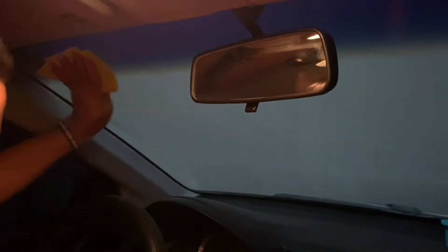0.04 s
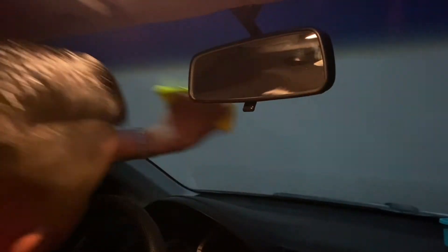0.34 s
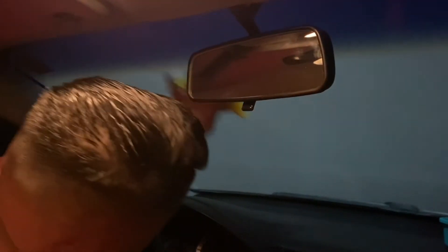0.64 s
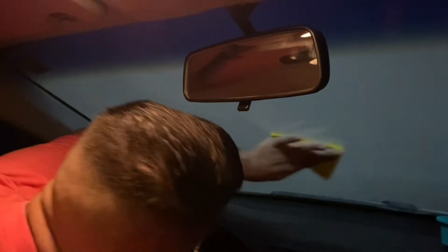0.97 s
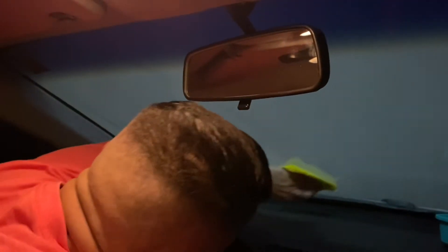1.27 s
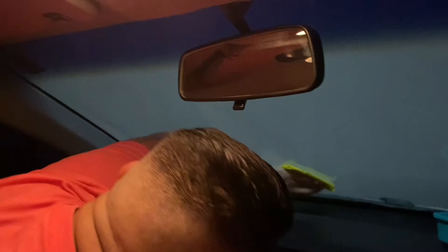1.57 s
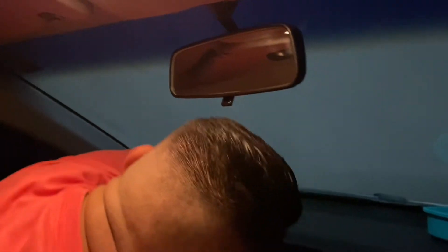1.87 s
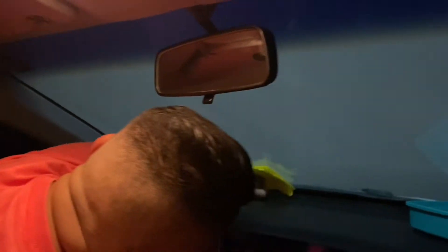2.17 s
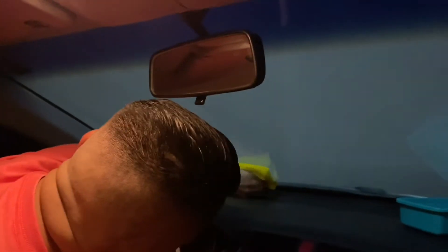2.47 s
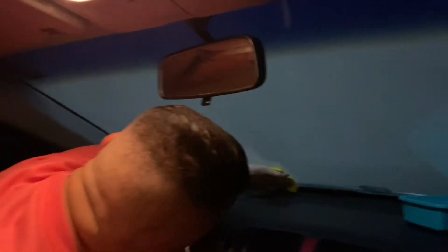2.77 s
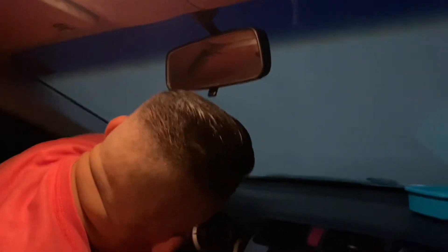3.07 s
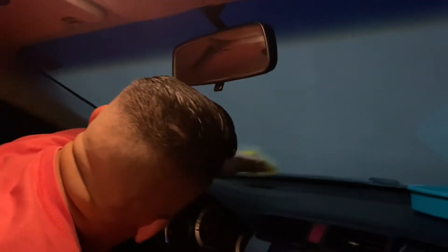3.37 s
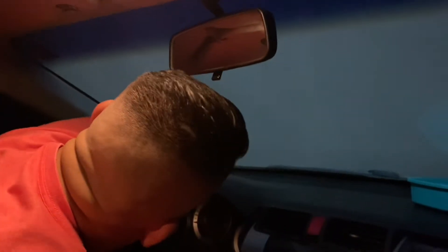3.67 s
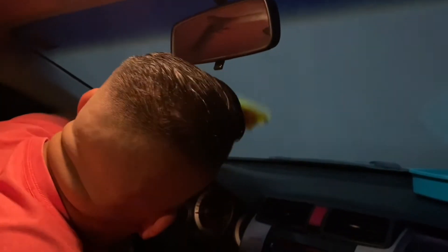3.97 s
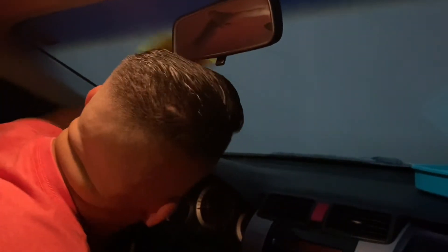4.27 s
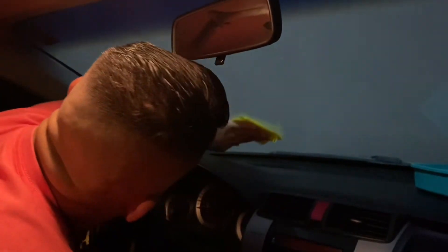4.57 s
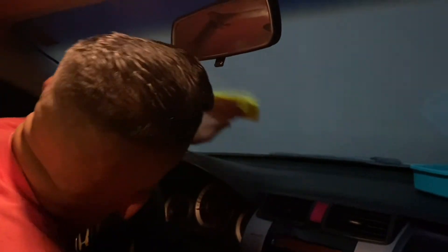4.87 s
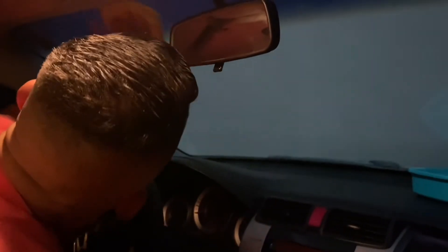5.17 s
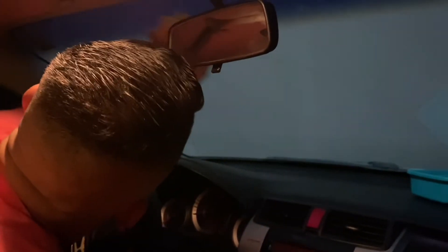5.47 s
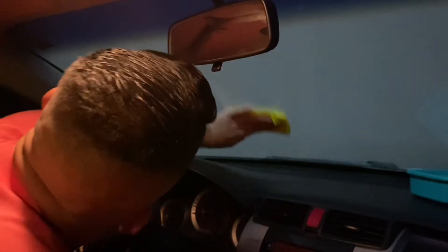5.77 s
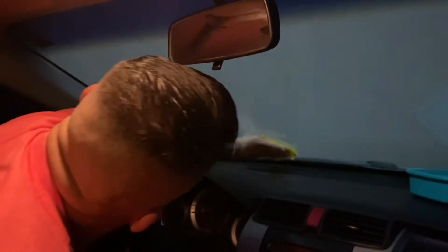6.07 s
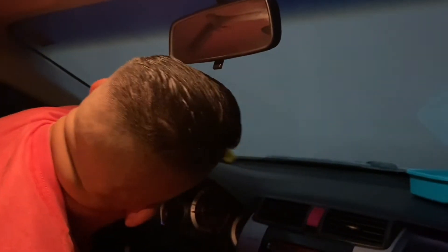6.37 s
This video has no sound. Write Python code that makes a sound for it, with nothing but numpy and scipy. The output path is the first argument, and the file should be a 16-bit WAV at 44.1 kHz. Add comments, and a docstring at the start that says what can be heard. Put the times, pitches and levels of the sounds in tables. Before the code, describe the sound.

Quiet, papery strokes of a cloth rub the inside of a car windshield, heard close up in the muffled cabin. The wiping soon turns into a deeper drag with finger skids, sharp knocks and dull dashboard bumps over a low seat rumble. A second group of knocks follows and plastic trim snaps once. Gentler wiping carries on with brief scuffs, ending in a few crisper swishes.

```python
"""A cloth wipes to and fro inside the windshield of a closed, parked car, its fibres hissing stroke by
stroke while the seat rumbles under the leaning person. From 1 s it is pressed to the foot of the glass:
it judders, fingers skid, and the hand knocks and bumps the dashboard. More knocks come just after 3 s,
then a snap of plastic trim. Lighter strokes lead to scuffs near 5.2 s and a few last, brighter wipes.
The small padded cabin answers briefly throughout."""
import sys
import numpy as np
from scipy import signal
from scipy.fft import rfft, irfft, next_fast_len
from scipy.io import wavfile

SR = 44100
rng = np.random.default_rng(int(sys.argv[2]) if len(sys.argv) > 2 else 0)


def wav_out(sig):
    """Save sig, one row per channel (or a flat mono array), as 16-bit PCM at SR to the path in sys.argv[1]."""
    wavfile.write(sys.argv[1], SR, np.round(np.clip(np.atleast_2d(sig).T, -1, 1) * 32767).astype(np.int16))


N = 287973
T = np.arange(N) / SR


def amp(db):
    """Decibels to gain."""
    return 10 ** (np.asarray(db) / 20)


def unit(x):
    """Scales each channel to an rms of one."""
    return x / np.sqrt(np.mean(x ** 2, axis=-1, keepdims=True) + 1e-20)


def unit_hit(x):
    """Scales a hit to the energy of 15 ms at unit level."""
    return unit(x) * np.sqrt(.015 * SR / x.shape[1])


def read(points, hz):
    """Reads a table on a log-frequency axis."""
    f, value = np.transpose(points)
    return np.interp(np.log(hz + 1), np.log(f + 1), value)


def follow(curve):
    """A level curve as a gain per sample, fading out over 50 ms beyond either end."""
    s, db = np.transpose(curve)
    gate = np.interp(T, [s[0] - .05, s[0], s[-1], s[-1] + .05], [0, 1, 1, 0])
    return amp(np.interp(T, s, db)) * gate


def add(mix, s, sound):
    """Mixes a sound in at s seconds."""
    part = mix[:, max(round(s * SR), 0):][:, :sound.shape[1]]
    part += sound[:, :part.shape[1]]


def colour(x, points, tilt_db=0, size=8192):
    """Minimum-phase EQ, tilted by tilt_db per octave about 1 kHz; the tilt levels off below 400 Hz."""
    hz = abs(np.fft.fftfreq(size, 1 / SR))
    octaves = np.log2(np.maximum(hz, 400) / 1000)
    log_gain = np.log(amp(read(points, hz) + tilt_db * octaves))
    taps = np.fft.ifft(np.exp(np.conj(signal.hilbert(log_gain)))).real[:size // 2]
    return signal.fftconvolve(x, taps[None], axes=1)[:, :x.shape[1]]


def wander(count, per_s):
    """Random modulation of unit rms, gliding to a new value per_s times a second."""
    steps = np.arange(count) * per_s / SR
    return unit(np.interp(steps, np.arange(4096), rng.standard_normal(4096)))


def slips(count, spread_db):
    """Countless fibres catching and letting go, a few much harder than the rest."""
    noise, catch = rng.standard_normal(count), rng.exponential(1, count)
    return unit(noise * amp(spread_db * np.minimum(catch, 6)))


def wiping(speed_power=0.86, flutter_db=1.76):
    """The hand speeds up and slows in one arch per stroke; fibres hiss and the glass adds a papery rub."""
    # strokes, turn to turn (mid-stroke time [s], length [s], hiss [dB], hiss tilt [dB/octave], rub [dB])
    strokes = [(0.141, 0.19, -70.5, 2, -75), (0.35, 0.21, -72.5, 1.5, -79), (0.509, 0.23, -62.5, 1, -68.5),
               (0.698, 0.26, -64, -0.5, -68), (0.887, 0.21, -70, 0.5, -69.5),
               (1.231, 0.66, -62.5, 1.5, -65), (1.681, 0.52, -63.5, 2, -71.5), (1.939, 0.21, -60, 0.5, -71),
               (2.193, 0.37, -62, 2, -74), (2.439, .12, -64.5, 0.5, -77), (2.573, 0.076, -69, 0, -76),
               (2.723, 0.34, -75.5, 0.5, -95), (2.983, 0.42, -67, 0.5, -71.5), (3.181, 0.22, -67, 1.5, -73),
               (3.517, 0.22, -69.5, -0.5, -80), (3.677, 0.26, -65, 6, -86), (3.873, 0.14, -71, 5, -86),
               (4.021, 0.15, -72, 1.5, -70.5), (4.112, .12, -67.5, 1, -74), (4.228, .12, -72, 0, -79),
               (4.45, 0.24, -74, 2.5, -85), (4.661, 0.061, -67.5, 0.5, -90), (4.782, 0.3, -70.5, 7.5, -91),
               (4.976, 0.25, -72.5, -0.5, -78), (5.533, 0.25, -103, 4, -74.5), (5.781, 0.33, -86, 3, -77.5),
               (5.953, .33, -62.5, 8, -74.5), (6.114, 0.21, -70, 0.5, -75.5), (6.311, .14, -73, 1, -69.5),
               (6.462, 0.28, -62, 5, -76.5)]
    # tone of the hissing fibres (frequency [Hz], level [dB])
    fibre_eq = [(60, -21), (250, 7), (700, 3), (1300, 3), (2000, 5), (3200, 5.5), (5000, 0), (7200, 0),
                (11000, -1), (16000, -4.5)]
    # tone of the rubbed glass (frequency [Hz], level [dB])
    glass_eq = [(60, -20), (300, 3.5), (700, -5), (950, -2), (1130, -4.5), (1340, 1.5), (1550, -10),
                (1800, -3.5), (2200, -3.5), (2550, -3), (2950, -8), (6000, -27.5), (16000, -40.5)]
    out = np.zeros((2, N))
    for s, length, hiss_db, tilt_db, rub_db in strokes:
        t = np.arange(max(s - length / 2, 0), s + length / 2, 1 / SR)
        speed = abs(np.cos(np.pi * (t - s) / length))
        # the reflections shift as the hand travels: crossfade between two spots
        travel = np.pi / 2 * ((t - s) / length + .5)
        start, end = (cabin(slips(len(t), spread_db=4), wet_db=-2, size=4096) for _ in range(2))
        friction = np.cos(travel) * start + np.sin(travel) * end
        friction *= amp(flutter_db * wander(len(t), per_s=35.4))
        hiss = amp(hiss_db) * speed ** speed_power * unit(colour(friction, fibre_eq, tilt_db, size=2048))
        rub = amp(rub_db) * speed * unit(colour(friction, glass_eq, size=2048))
        add(out, t[0], hiss + rub)
    return out


def dragging(judder_db=3):
    """Pressed hard into the gap between glass and dashboard, the cloth judders and sounds deeper."""
    # how hard the cloth drags (time [s], level [dB])
    pressure = [(1.05, -67), (1.14, -53.5), (1.266, -55), (1.374, -55), (1.556, -60.5), (1.816, -57),
                (2.142, -55), (2.35, -73)]
    # tone of the pressed cloth (frequency [Hz], level [dB])
    pressed_eq = [(40, -8.5), (150, 15), (300, -11), (600, -5.5), (900, -7.5), (1500, -17), (3000, -34),
                  (8000, -26.5)]
    drag = slips(N, spread_db=6.5) * amp(judder_db * wander(N, per_s=70))
    return follow(pressure) * unit(colour(cabin(drag, wet_db=6), pressed_eq))


def contact(t, noise_db, decay_s):
    """Hard surfaces meet: an impulse with a tiny burst of noise."""
    return (t == 0) + amp(noise_db) * rng.standard_normal(len(t)) * np.exp(-t / decay_s)


def knocks(off_pitch_db=9, nail_tilt=0.089):
    """Knuckles and nails ring the modes of glass and dashboard, with a tick from the hard contact."""
    # knocks (time [s], ring [dB], centre of the strike [Hz], tick [dB])
    hits = [(1.092, -42.5, 1100, -52.5), (1.108, -44, 910, -53.5), (1.187, -48, 1890, -74),
            (1.258, -48, 900, -66), (1.363, -48, 1220, -57.5), (1.503, -39, 830, -54),
            (1.5074, -26.5, 720, -43.5), (1.64, -58.5, 1200, -64.5), (1.714, -50, 955, -59.5),
            (1.829, -52, 710, -63.5), (1.978, -48.5, 370, -69), (2.065, -57, 1000, -59),
            (2.09, -48, 596, -67), (2.56, -67, 900, -62), (3.0662, -50, 1040, -79),
            (3.0901, -33.5, 1040, -50), (3.131, -46, 530, -80), (3.192, -35.5, 1200, -60.5),
            (3.4051, -57, 1134, -55), (3.545, -59, 1000, -68.5), (3.965, -68, 1000, -92)]
    # modes of glass and dashboard (frequency [Hz], level [dB], t60 [s])
    modes = [(295, 6, 0.055), (438, 2.5, 0.022), (530, -4.5, 0.04), (787, -3, 0.025), (873, 0.5, 0.029),
             (1000, -5, 0.021), (1179, -4, 0.023), (1507, -10.5, 0.027), (1800, -11, 0.0267),
             (2160, -13.5, 0.0284), (2760, -14, 0.03)]
    # tone of the tick (frequency [Hz], level [dB])
    tick_eq = [(100, -9), (700, -5.5), (1400, 1.5), (2500, 5), (4500, 1.5), (5800, -6.5), (7500, -3),
               (10500, -5), (12500, -10), (16000, -13)]
    out, t = np.zeros((2, N)), np.arange(SR // 4) / SR
    hz, mode_db, t60 = np.transpose(modes)[:, :, None]
    for s, ring_db, centre_hz, tick_db in hits:
        # every spot rings a little differently, and favours the modes near its own pitch
        detune = 1 + .015 * rng.standard_normal(hz.shape)
        struck_db = mode_db - off_pitch_db * np.log2(hz / centre_hz) ** 2
        ring = (amp(struck_db - 60 * t / t60) * np.sin(2 * np.pi * hz * detune * t)).sum(0)
        tick = contact(t, noise_db=-5, decay_s=0.0007)
        tilt_db = nail_tilt * (tick_db - ring_db)  # the more tick over ring, the brighter the tick
        add(out, s, amp(ring_db) * unit_hit(cabin(ring, wet_db=2.5)))
        add(out, s, amp(tick_db) * unit_hit(colour(cabin(tick, wet_db=15), tick_eq, tilt_db)))
    return out


def thumps(swell_cycles=1.005, overtone_ratio=1.407, overtone_db=-8, upper_ratio=2.4, rattle_db=-12):
    """Soft bumps swell and die in a few cycles of a low panel resonance; hard ones wake an upper one."""
    # hand heel and arm on padded panels (time [s], level [dB], pitch [Hz], relative upper resonance [dB])
    bumps = [(0.0, -42.5, 40.2, -28), (0.364, -43, 60.3, -19), (0.573, -40, 44.4, -27),
             (.797, -44.5, 155, -14), (0.944, -48, 129.6, -14.5), (1.108, -30, 96.4, -8),
             (1.145, -35, 121.7, -2), (1.196, -30.5, 89, -26), (1.261, -27, 110, -3.5),
             (1.283, -32, 115.5, -2), (1.308, -30.5, 76.4, -11), (1.511, -24.5, 103.5, -6.5),
             (1.516, -25, 175.3, -20), (1.553, -28, 64.6, -17.5), (1.958, -34, 155, -21.5),
             (1.983, -21, 160.5, -24), (1.996, -19, 116, -27), (2.03, -29.5, 137.5, -27),
             (2.068, -30, 157, -28), (2.088, -31.5, 187, -16), (2.114, -30, 63.2, -15),
             (2.25, -38.5, 80.2, -1.5), (2.42, -37.5, 82.3, -29), (2.62, -31.5, 65.8, -25),
             (2.926, -42, 100, -15), (3.082, -23, 107.4, -8.5), (3.202, -32.5, 127.6, -14.5),
             (3.407, -41.5, 89.6, -15.5), (4.262, -32, 51.8, -16), (4.682, -36.5, 97.7, -36.5),
             (5.169, -41.5, 133, -25), (5.228, -45, 52.4, -8)]
    out, t = np.zeros((2, N)), np.arange(SR // 3) / SR
    for s, db, hz, upper_db in bumps:
        phase, swell_s = 2 * np.pi * hz * t, swell_cycles / hz
        overtone = amp(overtone_db) * np.sin(overtone_ratio * phase)
        rattle = amp(rattle_db) * wander(len(t), per_s=2 * hz) * np.cos(phase)
        upper = amp(upper_db) * np.sin(upper_ratio * phase)
        push = amp(db) * t / swell_s * np.exp(1 - t / swell_s)
        mid = np.sin(phase) + overtone + rattle + upper
        side = rng.choice([-1, 1]) * (np.cos(phase) + upper)
        add(out, s, push * np.array([mid, side]))
    return out


def slides(events, surface_eq, grip_db, wet_db, let_go_s=0.03):
    """Short rough slides that build up and let go, through the resonances of the rubbed surface."""
    out, t = np.zeros((2, N)), np.arange(SR // 3) / SR
    for s, db, rise_s, tilt_db in events:
        grains = slips(len(t), spread_db=2) * amp(grip_db * wander(len(t), per_s=266))
        force = np.minimum(t / rise_s, 1) * np.exp(-(np.maximum(t - rise_s, 0) / let_go_s) ** 2)
        add(out, s, amp(db) * force * unit(colour(cabin(grains, wet_db), surface_eq, tilt_db)))
    return out


def scuffs():
    """The cloth or a sleeve catches on the trim."""
    # catches (time [s], level [dB], rise [s], tilt [dB/octave])
    catches = [(1.084, -41, 0.0088, -5.5), (2.064, -51.5, 0.025, -1.5), (3.073, -37, 0.018, -14.5),
               (5.153, -43, 0.016, -1), (5.195, -58, 0.093, -0.5), (5.29, -46.5, 0.037, -2)]
    # tone of the scuffed trim (frequency [Hz], level [dB])
    trim_eq = [(50, 0), (150, -5), (250, -4.5), (330, 1.5), (480, 7), (600, -3), (850, -2), (1200, -4.5),
               (1430, 1), (1800, -2.5), (2200, -7.5), (4000, -9), (7500, -6), (11000, -12.5),
               (16000, -10.5)]
    return slides(catches, trim_eq, grip_db=2.5, wet_db=-3.5)


def skids():
    """Fingers skid on the glass through the cloth."""
    # finger skids (time [s], level [dB], rise [s], tilt [dB/octave])
    events = [(1.182, -44, 0.0046, -0.5), (1.256, -42.5, 0.024, -2.5), (2.12, -43, 0.024, 0)]
    # hollow tone of a skid (frequency [Hz], level [dB])
    skid_eq = [(60, -5), (200, -9), (275, 7), (335, -10), (430, -4.5), (535, 6.5), (660, -10.5), (780, -5),
               (880, -3), (1020, -14), (1270, -12), (1600, -31), (2200, -22), (4000, -37), (16000, -42)]
    return slides(events, skid_eq, grip_db=3, wet_db=2.5)


def snap():
    """Hard plastic trim snaps once: a bright tick with no ring, only the cabin's short answer."""
    # the snap (time [s], level [dB])
    events = [(3.4058, -43.5)]
    # tone of the plastic (frequency [Hz], level [dB])
    plastic_eq = [(100, -17), (700, 0.5), (1500, 2.5), (2500, -3), (4000, 1), (7000, -0.5), (10500, 0.5),
                  (13000, -21), (16000, -9)]
    out, t = np.zeros((2, N)), np.arange(SR // 4) / SR
    for s, db in events:
        tick = contact(t, noise_db=-8, decay_s=0.0016)
        add(out, s, amp(db) * unit_hit(colour(cabin(tick, wet_db=-2), plastic_eq)))
    return out


def rumble(seat_db=4, lumps_db=2.5, air_db=-76):
    """Seat and car body rumble in lumps as the person leans, over the still air of the cabin."""
    # weight shifting in the seat (time [s], relative level [dB])
    lean = [(0.0, -48), (0.29, -62), (1.03, -55.5), (1.25, -41), (1.51, -48), (1.76, -50.5), (2.0, -58.5),
            (2.13, -43.5), (2.51, -50), (2.75, -58), (3.33, -56), (3.7, -60.5), (4.05, -63), (4.42, -61.5),
            (4.62, -59), (4.87, -65), (5.4, -60.5), (5.6, -64), (5.82, -61.5), (6.2, -59), (6.53, -60)]
    # tone of seat and body (frequency [Hz], level [dB])
    seat_eq = [(12, -29), (25, -11), (42, 5.5), (60, -2), (110, -5.5), (170, -14.5), (280, -26.5),
               (500, -41.5), (1500, -57.5), (6000, -79.5)]
    # room tone of the cabin (frequency [Hz], level [dB])
    air_eq = [(20, 12.5), (100, 12.5), (300, 2.5), (800, -1.5), (2000, -0.5), (3500, -7), (8000, -10.5),
              (16000, -8)]
    seat = unit(colour(rng.standard_normal((2, N)), seat_eq))
    seat *= amp(lumps_db * wander(N, per_s=22))
    air = unit(colour(rng.standard_normal((2, N)), air_eq))
    return amp(seat_db) * follow(lean) * seat + amp(air_db) * air


def cabin(x, wet_db, size=8192):
    """Direct sound plus the padded cabin's dense, quickly dying reflections; returns mid and side."""
    # decay of the reflections (frequency [Hz], t60 [s])
    decay = [(100, 0.2), (400, 0.081), (1500, 0.064), (5000, 0.081), (14000, 0.051)]
    hz, t, noise = signal.stft(rng.standard_normal((2, size)), SR, nperseg=128)
    response = signal.istft(noise * amp(-60 * t / read(decay, hz)[:, None]), SR)[1]
    response *= amp(wet_db) / np.linalg.norm(response[0])
    response[0, 0] += 1  # direct sound, in the mid only
    response /= np.linalg.norm(response, axis=1, keepdims=True)
    return signal.fftconvolve(x[None], response, axes=1)[:, :len(x)]


def scene():
    """All sources as mid and side, spread to left and right."""
    # stereo width: how unlike the two microphone ports are (frequency [Hz], side level [dB])
    width = [(50, -15), (130, -14), (270, -4), (700, -2.5), (1200, -1.5), (3000, -4), (6000, -2),
             (8000, -41.5), (16000, -15.5)]
    mid, side = scuffs() + skids() + wiping() + dragging() + knocks() + snap() + thumps() + rumble()
    side = colour(side[None], width)[0]
    return np.array([mid + side, mid - side])


def record(dry, low_cut_hz=33, high_cut_hz=15900):
    """Two microphone ports shed the extreme bass and top, and differ in level and in treble phase."""
    # balance of the ports (frequency [Hz], left over right [dB])
    balance = [(40, -0.5), (110, -3), (200, -3.5), (380, 2), (1200, -2), (2400, 0), (4400, 3), (8000, 1)]
    # phase between the ports (frequency [Hz], lead of the left [half turns])
    phase_lead = [(7000, 0), (17500, -5)]
    size = next_fast_len(N + 4096)
    hz = np.fft.rfftfreq(size, 1 / SR)
    low_cut = signal.butter(5, low_cut_hz, "highpass", fs=SR, output="sos")
    high_cut = signal.firwin(511, high_cut_hz, window=("kaiser", 9), fs=SR)
    lead = np.pi * np.interp(hz, *np.transpose(phase_lead))
    left = amp(read(balance, hz) / 2) * np.exp(1j * lead / 2)  # each port takes half the difference
    spectrum = rfft(signal.sosfilt(low_cut, dry), size)
    ports = irfft(spectrum * np.array([left, 1 / left]), size)[:, :N]
    return signal.oaconvolve(ports, high_cut[None], "same")


dry = scene()
out = record(dry)
wav_out(out)
```